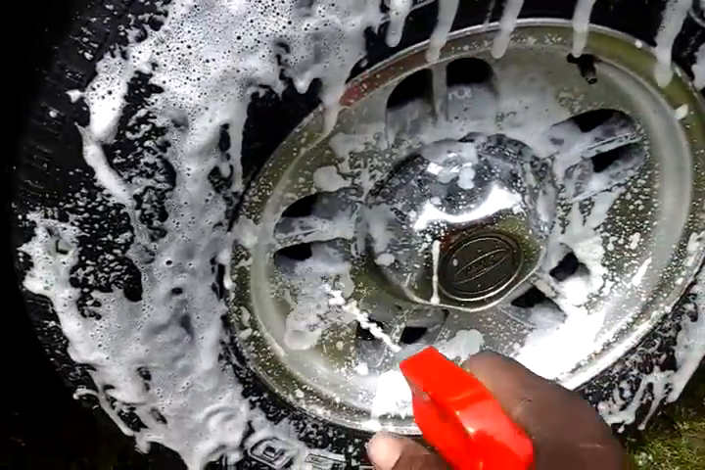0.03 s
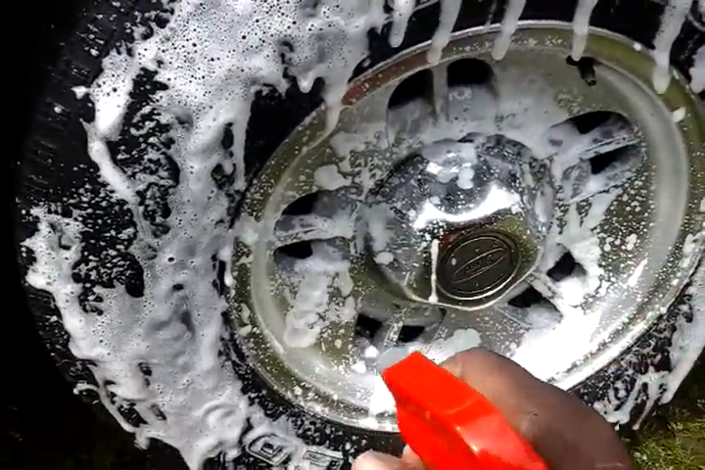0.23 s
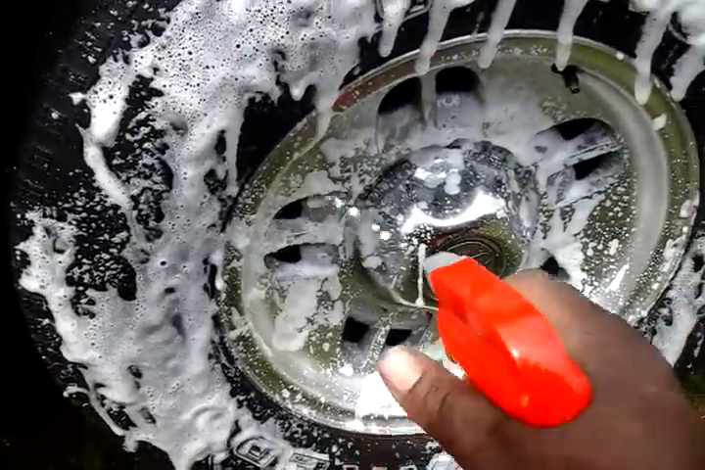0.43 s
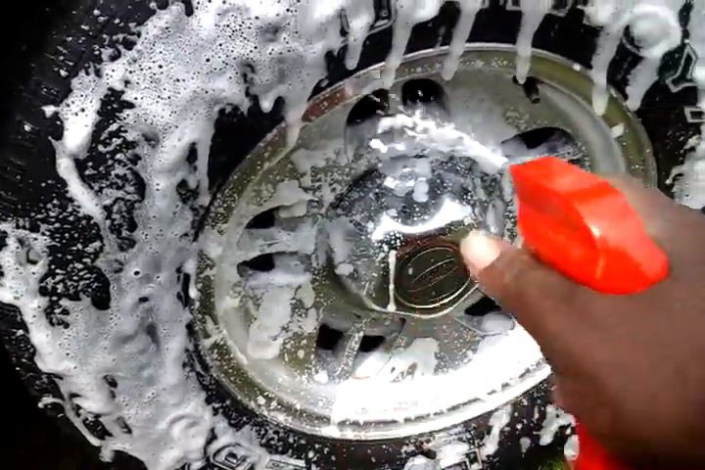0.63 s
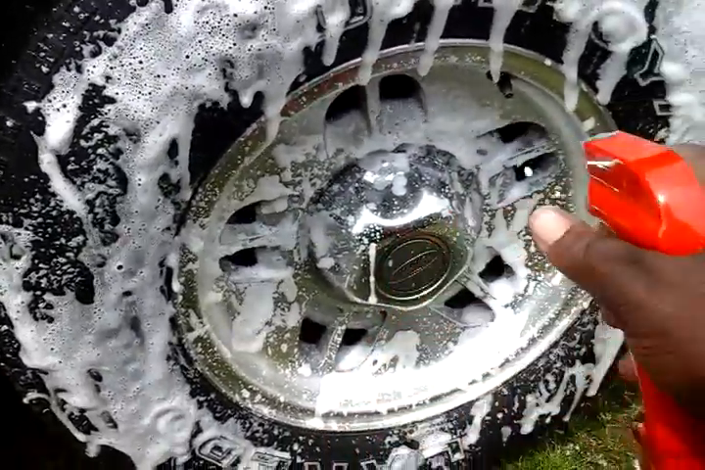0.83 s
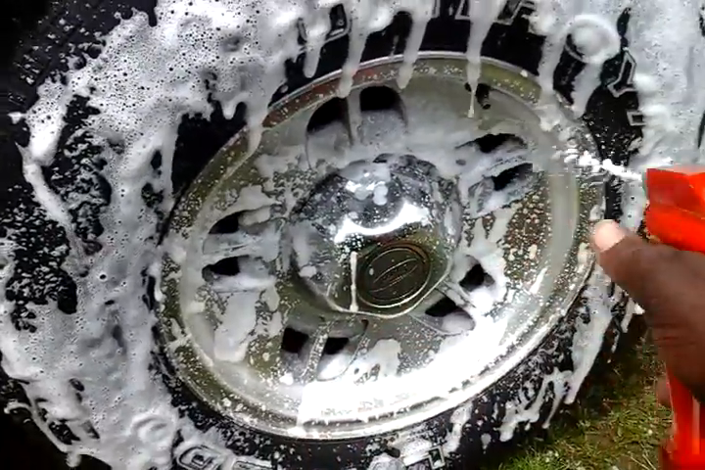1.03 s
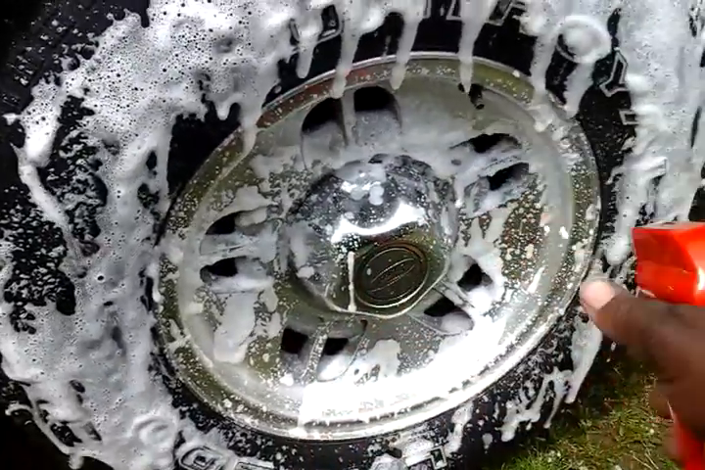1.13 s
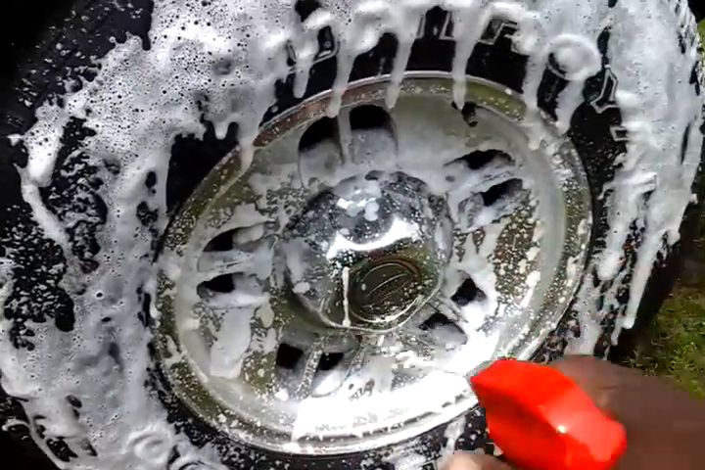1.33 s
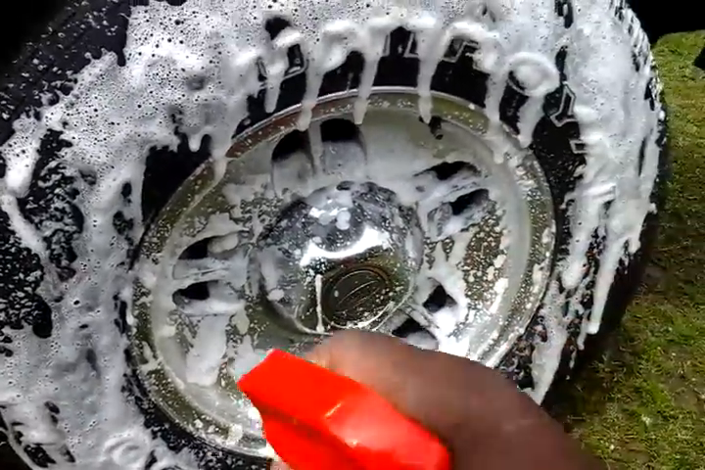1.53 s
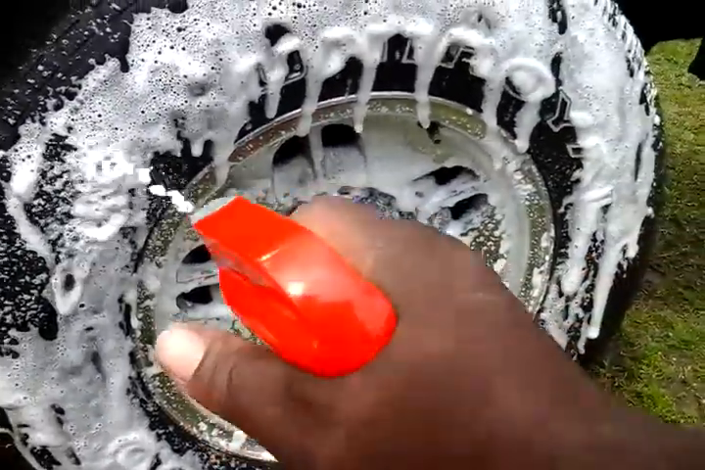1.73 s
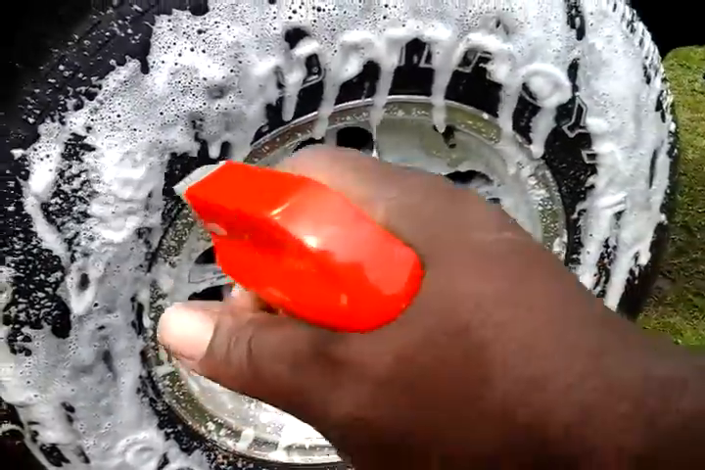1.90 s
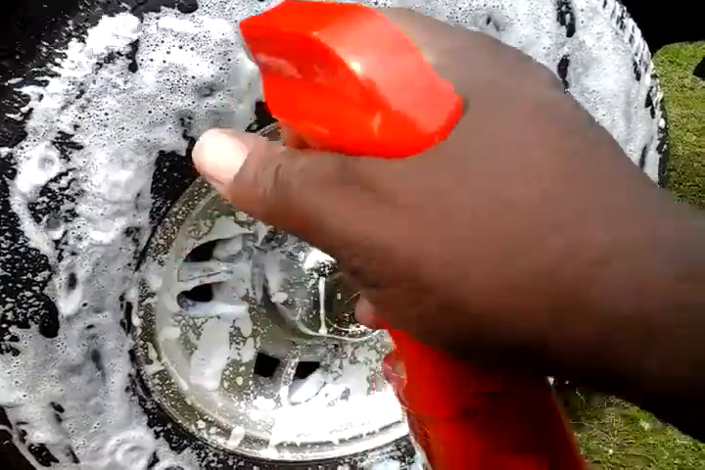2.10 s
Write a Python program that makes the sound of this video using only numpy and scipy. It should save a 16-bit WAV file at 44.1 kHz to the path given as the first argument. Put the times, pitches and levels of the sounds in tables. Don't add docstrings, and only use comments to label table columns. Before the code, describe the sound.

Regular wet bursts from a trigger sprayer hit a hollow wheel with a slight ringing colour, beginning mid-squirt; between them the pump gurgles and clacks, over low outdoor hum and a faint distant bird, heard close on a phone.

```python
import sys
import numpy as np
from scipy import signal
from scipy.fft import rfft, irfft, next_fast_len
from scipy.io import wavfile
from scipy.ndimage import uniform_filter1d, map_coordinates

SR = 44100
rng = np.random.default_rng(int(sys.argv[2]) if len(sys.argv) > 2 else 0)


def transcribe(signal):
    frames = np.atleast_2d(signal).T
    limited = np.clip(frames, -1, 1)
    pcm = np.round(limited * 32767).astype(np.int16)
    wavfile.write(sys.argv[1], SR, pcm)


def nominal_scale(level):
    x = np.asarray(level, float) / 20
    return 10 ** x


N = 95256
T = np.arange(N) / SR


def unit(x):
    return x / np.sqrt(np.mean(x ** 2) + 1e-20)


def along(points, hz):
    f, v = np.transpose(points)
    return np.interp(np.log(hz + 1), np.log(f + 1), v)


def wobble(rate):
    knots = rng.standard_normal(int(N * rate / SR) + 4)
    return map_coordinates(knots, [T * rate])


def filtered(x, response):
    m = next_fast_len(N + SR // 2)
    hz = np.fft.rfftfreq(m, 1 / SR)
    return irfft(rfft(x, m) * response(hz), m)[..., :N]


def colour(points):
    return lambda hz: nominal_scale(along(points, hz))


def body(peaks):
    def response(f):
        total = 0
        for k, (centre, width, db) in enumerate(peaks):
            damping = 1j * f * width
            total = total + (-1) ** k * nominal_scale(db) * damping / (centre ** 2 - f ** 2 + damping)
        return total
    return response


def droplets(spiky_db, shared):
    drops = rng.standard_normal((3, N)) * nominal_scale(spiky_db * rng.exponential(size=N))
    shared = np.clip(shared, 0, 1)
    return np.sqrt(shared) * drops[0] + np.sqrt(1 - shared) * drops[1:]


def patchy(x, depth_db):
    z = signal.stft(x, nperseg=512)[2]
    field = rng.standard_normal(z.shape[1:])
    field = uniform_filter1d(field, size=3, axis=0)
    field = uniform_filter1d(field, size=9, axis=1)
    streaked = z * nominal_scale(depth_db * unit(field))
    return unit(signal.istft(streaked, nperseg=512)[1][:, :N])


def stroke(start, length, lead, sag_db):
    foot_db, rise_db_per_s, fall_db_per_s = -24, 686, 683
    t = T - start + lead
    hold = -sag_db * (2 * (t - 0.46 * length) / length) ** 2
    hold = hold - sag_db * np.clip(t / length, 0, 2) * (lead > 0)
    rise = foot_db + rise_db_per_s * t
    fall = foot_db - fall_db_per_s * (t - lead - length)
    db = np.minimum(np.minimum(rise, fall), hold)
    return uniform_filter1d(np.maximum(db, -90), size=400)


# start [t/s], length [t/s], level [dB], left over right [dB], nozzle hiss [dB]
SQUEEZES = [
    (-.032, 0.19, -30.5, -1, -4),
    (0.311, .18, -28.5, -1.5, -4),
    (0.639, 0.17, -28.5, 0.5, -5),
    (.96, 0.17, -29.5, 0, -3.5),
    (1.28, 0.17, -30, 2, -3.5),
    (1.616, .19, -29, 3, -2.5),
    (1.972, .18, -30, 3, -3),
]
RING_DB = [
    -18,
    -9,
    -5,
    -11,
    -7,
    -9,
    -11,
]
# [f/Hz], [level/dB]
SPLASH_SPECTRUM = [(800, -47.5), (1900, -16), (3200, -6), (4000, -6.5), (4800, -4), (7000, -7), (9500, -8),
                   (15500, -13.5)]
# [f/Hz], [level/dB]
JET_SPECTRUM = [(2000, -22), (4000, -2.5), (7500, 2), (9200, -6), (11500, -7), (14200, -0.5), (15500, -99)]
# [f/Hz], width [f/Hz], [level/dB]
WHEEL_HOLLOWS = [(4360, 100, -0.5), (5140, 350, -9), (6470, 100, -11.5), (6400, 100, -6.5)]
# [f/Hz], width [f/Hz], [level/dB]
WHEEL_RING = [(4804, 230, 0.5), (5215, 420, -4), (6905, 110, -7.5)]


def spray():
    patchy_db, lag_ms = 2, 0.4

    def splash_response(f):
        return colour(SPLASH_SPECTRUM)(f) * (1 + abs(body(WHEEL_HOLLOWS)(f)))

    splash = filtered(droplets(spiky_db=1.0, shared=0.45), splash_response)
    splash = patchy(splash, patchy_db) * nominal_scale(0.8 * wobble(90) + 0.67 * wobble(400))
    jet = filtered(droplets(spiky_db=1.2, shared=0.35), colour(JET_SPECTRUM))
    jet = patchy(jet, patchy_db) * nominal_scale(0.8 * wobble(120))
    ring = filtered(droplets(spiky_db=0.0, shared=0.47), lambda f: body(WHEEL_RING)(f) ** 2)
    ring = unit(ring) * nominal_scale(1.2 * wobble(50))
    out = np.zeros((2, N))
    for (start, length, db, pan_db, hiss_db), ring_db in zip(SQUEEZES, RING_DB):
        both = (splash + nominal_scale(ring_db) * ring) * nominal_scale(stroke(start, length, lead=0, sag_db=14))
        both = both + jet * nominal_scale(hiss_db + stroke(start, length, lead=0.0066, sag_db=1.5))
        lag = round(rng.uniform(-1, 1) * lag_ms * SR / 1000)
        both[0] = np.roll(both[0], lag)
        out += both * nominal_scale(db + 2.5 + np.array([[pan_db], [-pan_db]]) / 2)
    return out


# [f/Hz], [level/dB]
AIR_SPECTRUM = [(20, -4), (60, -6), (250, -1), (800, -2.5), (2200, -9.5), (4750, -13.5), (7000, -13.5),
                (14500, -20.5)]
# [f/Hz], correlation [clipped to -1 to 1 after interpolation]
AIR_ALIKE = [(60, -0.56), (300, -0.49), (800, -0.53), (2000, -0.62), (8000, -1.79)]
# [f/Hz], [level/dB]
HUM = [(115, -65.5)]


def air():
    air_db, bump_db, bump_s = -56.5, -44.5, 0.16

    def mid_side(hz):
        turn = np.arccos(np.clip(along(AIR_ALIKE, hz), -1, 1)) / 2
        return colour(AIR_SPECTRUM)(hz) * [np.cos(turn), np.sin(turn)]

    mid, side = filtered(rng.standard_normal((2, N)), mid_side)
    floor = patchy(np.array([mid + side, mid - side]), depth_db=1.5) * nominal_scale(air_db + 2)
    hum = np.zeros(N)
    for hz, db in HUM:
        swell = nominal_scale(db + 8 + 0.65 * wobble(3.8))
        hum += swell * np.sin(2 * np.pi * hz * T + 0.21 * wobble(6.3))
    bump = unit(filtered(rng.standard_normal((2, N)), body([(200, 220, 0)])))
    bump = bump * nominal_scale(bump_db - 60 * T / bump_s)
    return floor + hum * [[1.02], [-0.95]] + bump


def foam():
    foam_db, pops_per_s = -59, 6000
    fresh = np.full(N, 0.24)
    for start, length, *_ in SQUEEZES:
        fading = nominal_scale(-60 * np.abs(T - start - length) / 0.17)
        fresh += (T > start + length * 0.8) * fading * 4
    pops = (rng.random(N) < pops_per_s / SR) * nominal_scale(2.5 * rng.exponential(size=N))
    pops = pops * rng.standard_normal((2, N))
    crackle = unit(filtered(pops, body([(4630, 9000, -12), (9200, 7300, -11)])))
    return nominal_scale(foam_db) * fresh * crackle


def bursts(times, rows, peaks, spiky_db, shared, die_db, tail_s):
    click_db = 13.5
    gain, blows = np.zeros(N), np.zeros(N)
    for start, (length, db) in zip(times, rows):
        t = T - start
        hold_db = db - die_db * np.clip(t / length, 0, 1)
        tail_db = -60 * np.maximum(t - length, 0) / tail_s
        gain += (t > 0) * nominal_scale(hold_db + tail_db)
        blows[round(start * SR)] = nominal_scale(db + click_db)
    kicks = droplets(spiky_db=spiky_db, shared=shared)
    kicks = kicks / np.std(kicks) * gain * nominal_scale(3.2 * wobble(600)) + blows
    body_gain = np.std(filtered(rng.standard_normal(N), body(peaks)))
    return filtered(kicks, body(peaks)) / body_gain


SPIT_TIMES = [.2928, .622, .9535, .9625, .970, 1.2, 1.270, 1.546, 1.5955, 1.612, 1.953]
# length [t/s], [level/dB]
SPITS = [(0.011, -36), (0.015, -40), (.007, -29), (0.0051, -31), (0.0094, -31.5), (0.038, -55),
         (0.018, -33.5), (.004, -47), (0.011, -45), (0.0018, -57), (0.0096, -41.5)]
# [f/Hz], width [f/Hz], [level/dB]
VALVE_BODY = [(2350, 640, -1), (3350, 800, -6.5), (5250, 1400, 0), (6600, 1540, -1), (8100, 1100, -7)]


def valve_spits():
    return bursts(SPIT_TIMES, SPITS, VALVE_BODY, spiky_db=1.5, shared=0.36, die_db=7, tail_s=0.016)


# middle [t/s], half width [t/s], [level/dB]
REFILLS = [
    (.235, 0.035, -53),
    (0.551, 0.11, -53),
    (0.882, 0.046, -53.5),
    (1.209, 0.036, -54.5),
    (1.521, 0.036, -51.5),
    (1.884, 0.048, -52.5),
]
# [f/Hz], [level/dB]
SUCK_SPECTRUM = [(600, -40), (1200, -8.5), (2600, 5), (4500, -0.5), (6500, -2), (10000, -17)]


def refill():
    flow = sum(nominal_scale(db - 5.7 * ((T - middle) / half) ** 2) for middle, half, db in REFILLS)
    suck = unit(filtered(droplets(spiky_db=1, shared=0.5), colour(SUCK_SPECTRUM)))
    return flow * suck * nominal_scale(1.4 * wobble(150))


KNOCK_TIMES = [.5995, .6013, 1.5615, 1.925, 1.9275]
# rattle [t/s], [level/dB]
KNOCKS = [
    (0.0029, -49),
    (.005, -31.5),
    (0.011, -35.5),
    (0.0012, -45),
    (0.002, -34),
]
# [f/Hz], width [f/Hz], [level/dB]
TRIGGER_BODY = [(1065, 400, -9.5), (2080, 450, -8.5), (2860, 540, -2), (3450, 520, -0.5), (5140, 900, -4.5)]


def trigger_knocks():
    knocks = bursts(KNOCK_TIMES, KNOCKS, TRIGGER_BODY, spiky_db=3, shared=0.54, die_db=9, tail_s=0.031)
    top_hz = 6260
    knocks = filtered(knocks, lambda f: 1 / (1 + 1j * f / top_hz) ** 2) * nominal_scale(3)
    return knocks * nominal_scale([[1.5], [-1.5]])


# start [t/s], length [t/s], pitch [f/Hz], [level/dB]
WHISTLES = [
    (1.12, .04, 3150, -64),
    (1.17, .03, 3120, -63),
    (1.81, .14, 3170, -63),
]


def bird():
    droop_hz_per_s = 900
    out = np.zeros(N)
    for start, length, hz, db in WHISTLES:
        t = T - start
        swell = np.sin(np.pi * np.clip(t / length, 0, 1)) ** 0.3 * nominal_scale(db + 2 * wobble(70))
        cycles = hz * t - droop_hz_per_s * t * t / 2
        out += swell * np.sin(0.8 * wobble(120) + 2 * np.pi * cycles)
    return out * nominal_scale([[1.5], [-1.5]])


def scene():
    return spray() + air() + foam() + valve_spits() + refill() + trigger_knocks() + bird()


def starved(x):
    hop, grid = 1024, 456
    top_hz, step_db, keep, spared = 2400, -3, 0.4, 0.012
    fine_hz, fine_db = 170, -5
    n = np.arange(2 * hop) + 0.5
    k = np.arange(int(top_hz * 2 * hop / SR)) + 0.5
    window = np.sin(np.pi * n / (2 * hop))
    basis = np.sqrt(2 / hop) * window * np.cos(np.pi / hop * np.outer(k, n + hop / 2))
    padded = np.pad(x, ((0, 0), (2 * hop - grid, 2 * hop)))
    at = np.arange(0, padded.shape[1] - 2 * hop, hop)[:, None] + np.arange(2 * hop)
    frames = padded[:, at]
    lines = frames @ basis.T
    loudness = frames.std((0, 2))[:, None]
    step = nominal_scale(step_db + fine_db * (k * SR / (2 * hop) < fine_hz)) * loudness + 1e-9
    rounded = np.sign(lines) * np.floor(np.abs(lines) / step + keep) * step
    error = (rounded - lines) @ basis
    change = np.array([np.bincount(at.ravel(), e.ravel(), padded.shape[1]) for e in error])
    return x + (1 - spared) * change[:, 2 * hop - grid:][:, :N]


def top_cut(x):
    return signal.sosfilt(signal.butter(12, 15840, fs=SR, output="sos"), x)


# [f/Hz], [level/dB]
PORTS = [(300, 2.5), (1000, 6), (2000, 8), (3500, 5), (5600, -8), (7500, -5), (10500, -0.5), (15000, -4)]


def record(dry):
    top_hz, over_top_db = 14800, -70

    def port_response(hz):
        return nominal_scale(along(PORTS, hz) * [[0.5], [-0.5]] + over_top_db * (hz > top_hz))

    mix = starved(filtered(dry, port_response))
    return top_cut(mix)


dry = scene()
out = record(dry)
transcribe(out)
```